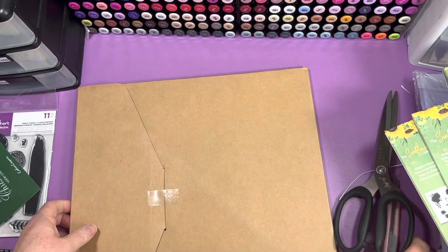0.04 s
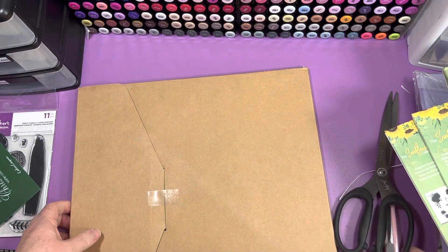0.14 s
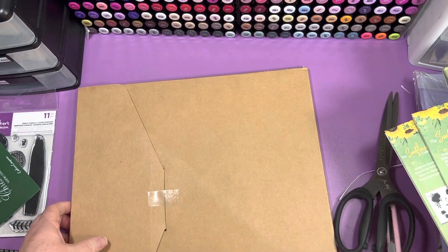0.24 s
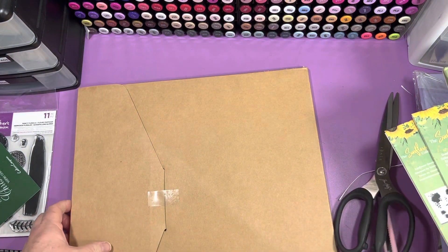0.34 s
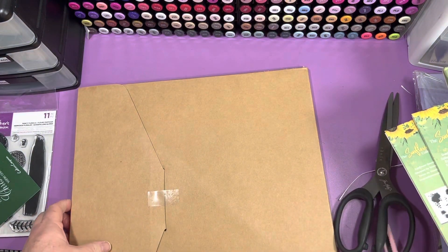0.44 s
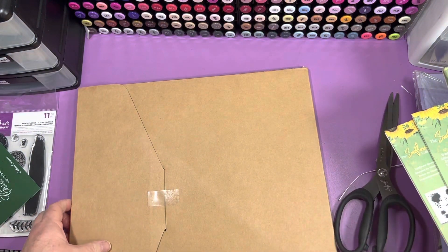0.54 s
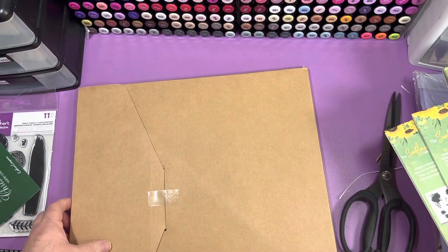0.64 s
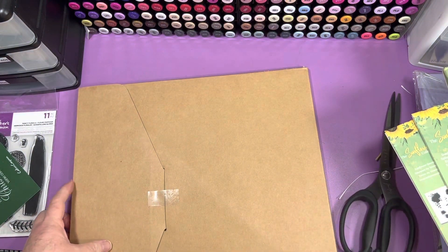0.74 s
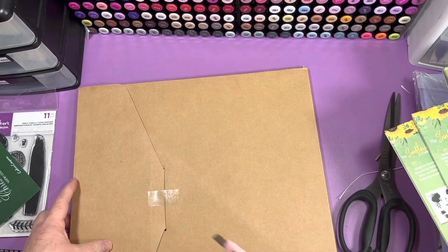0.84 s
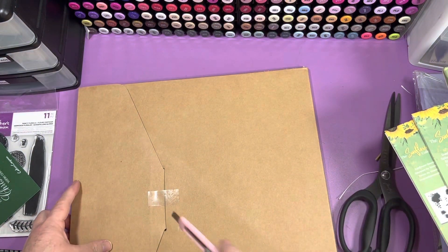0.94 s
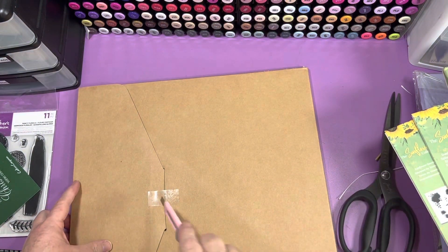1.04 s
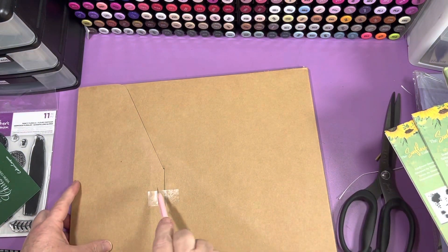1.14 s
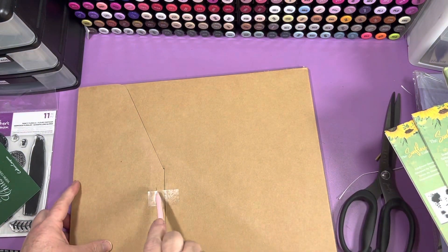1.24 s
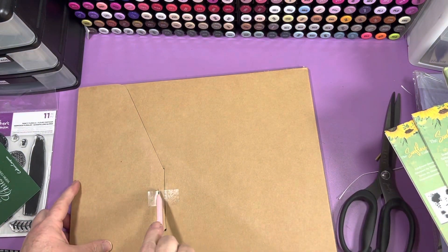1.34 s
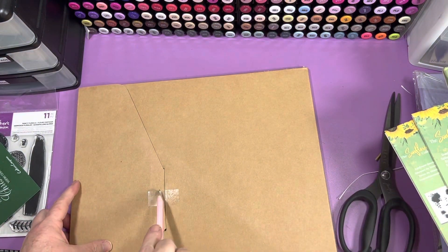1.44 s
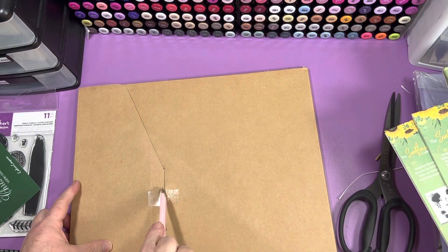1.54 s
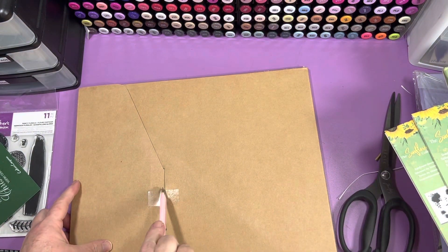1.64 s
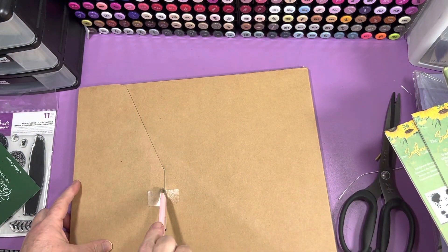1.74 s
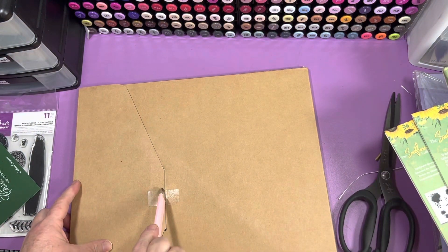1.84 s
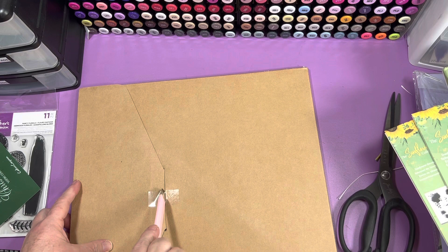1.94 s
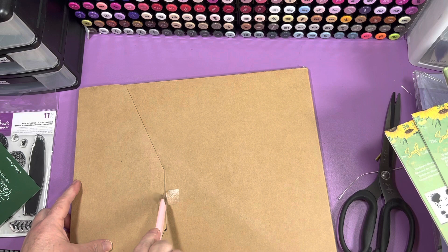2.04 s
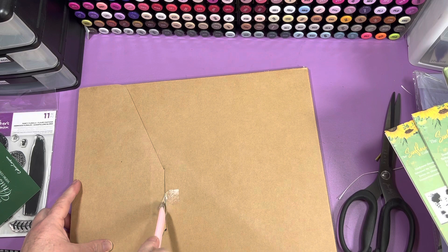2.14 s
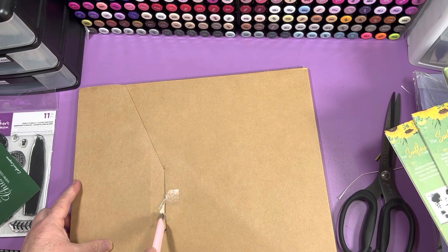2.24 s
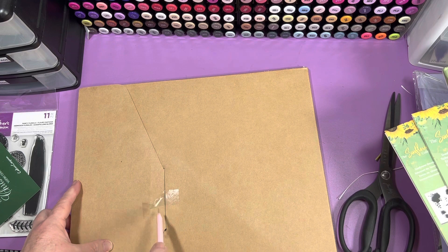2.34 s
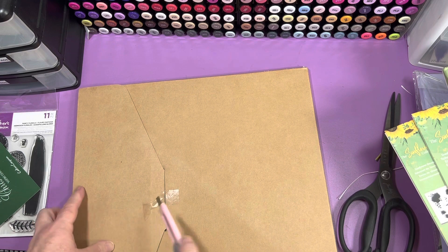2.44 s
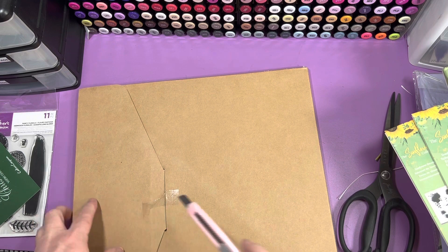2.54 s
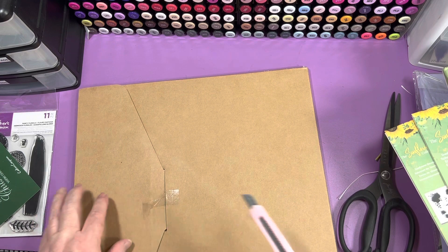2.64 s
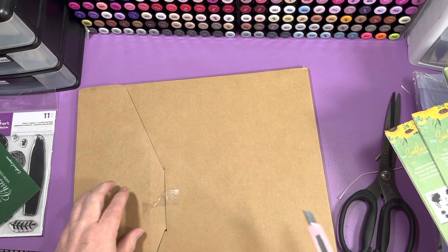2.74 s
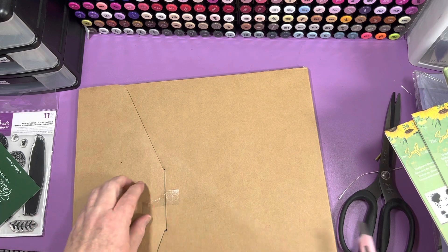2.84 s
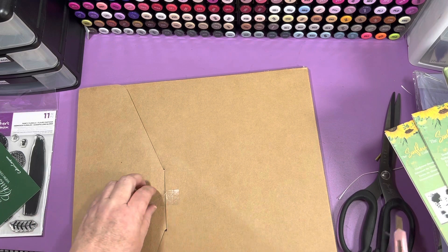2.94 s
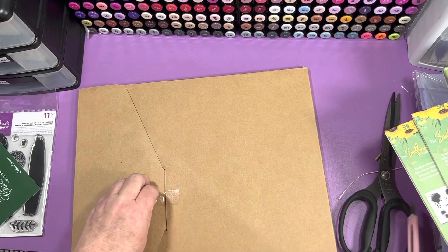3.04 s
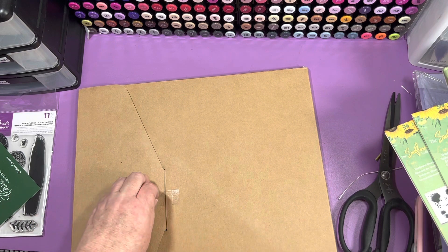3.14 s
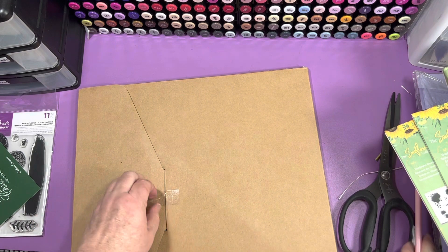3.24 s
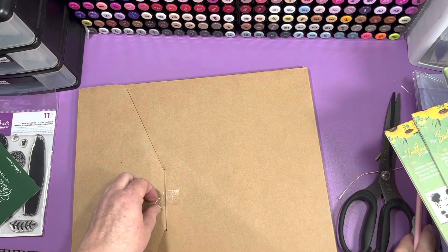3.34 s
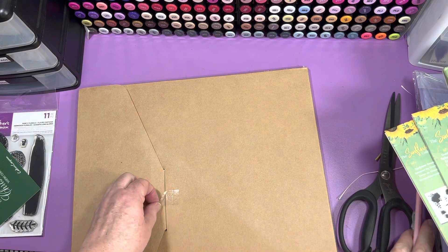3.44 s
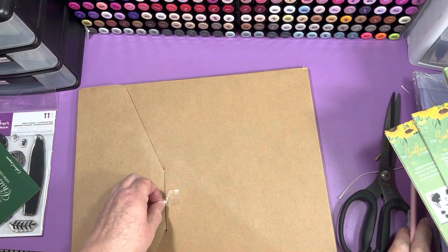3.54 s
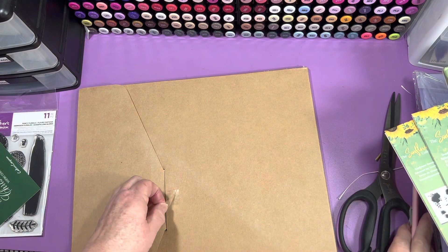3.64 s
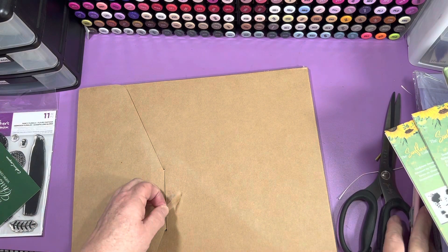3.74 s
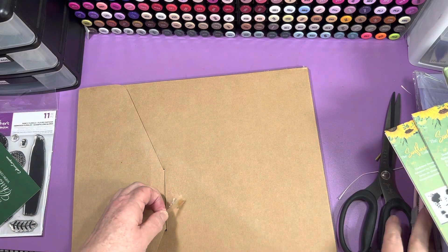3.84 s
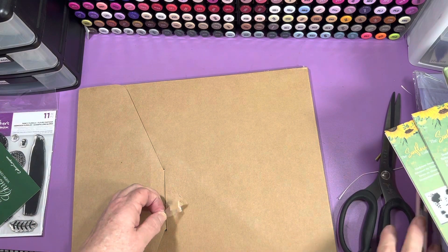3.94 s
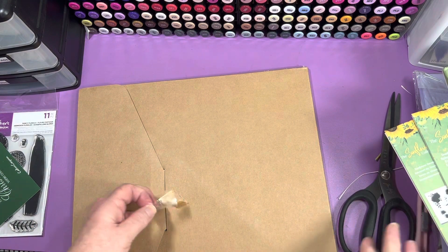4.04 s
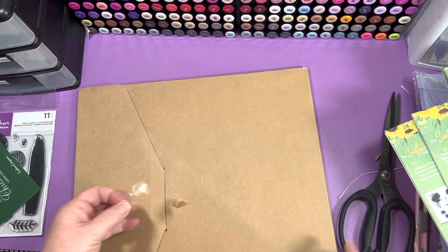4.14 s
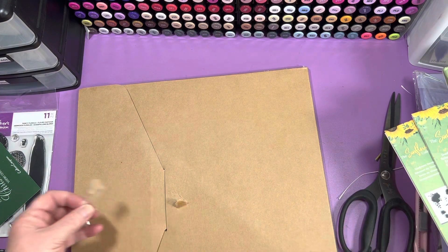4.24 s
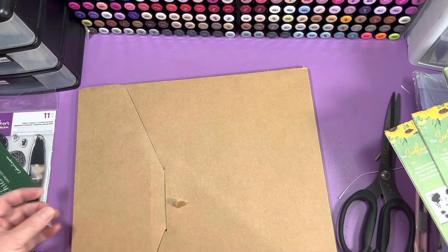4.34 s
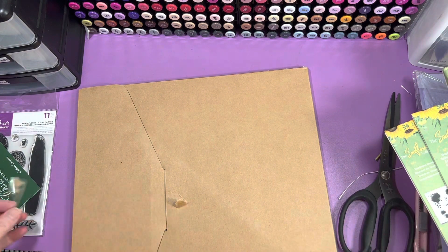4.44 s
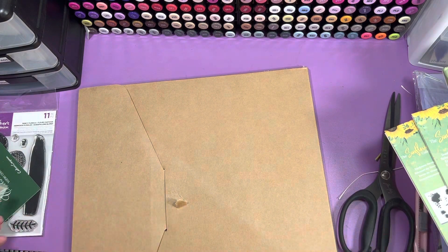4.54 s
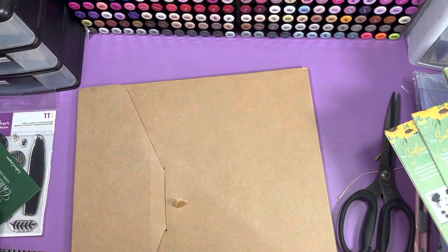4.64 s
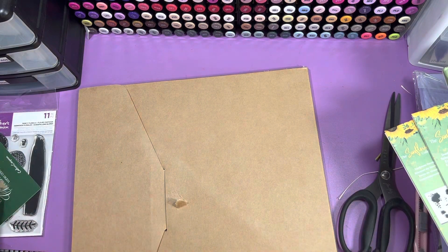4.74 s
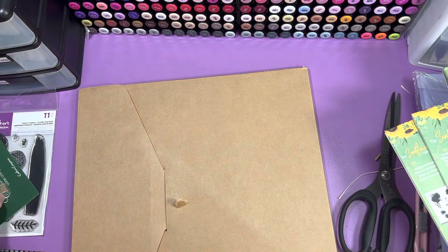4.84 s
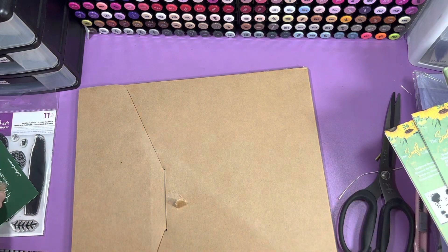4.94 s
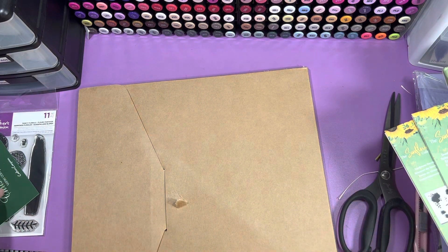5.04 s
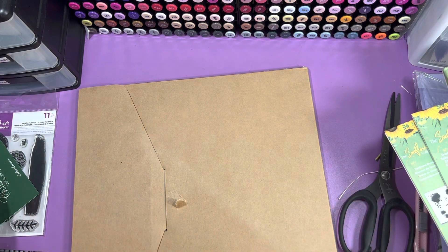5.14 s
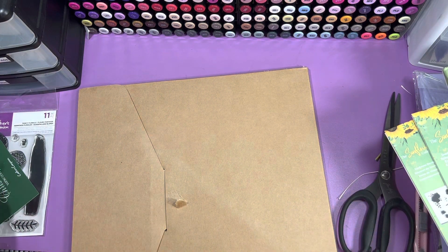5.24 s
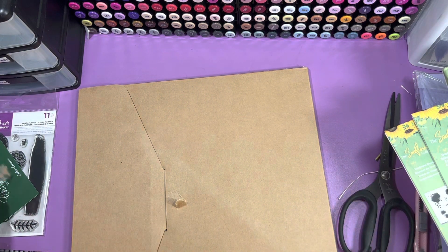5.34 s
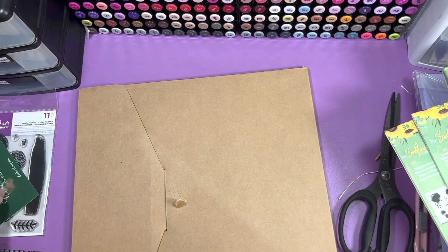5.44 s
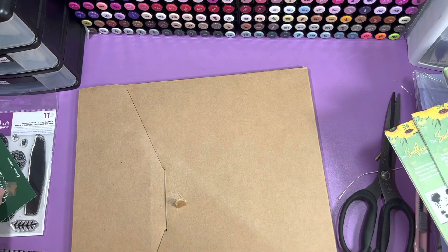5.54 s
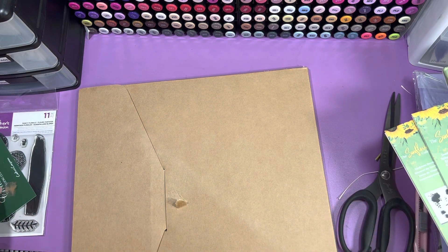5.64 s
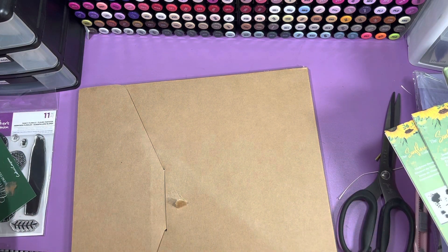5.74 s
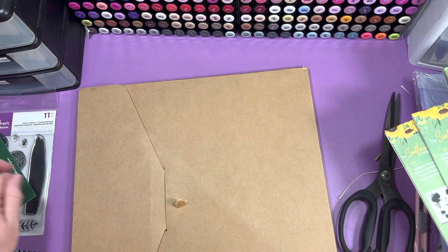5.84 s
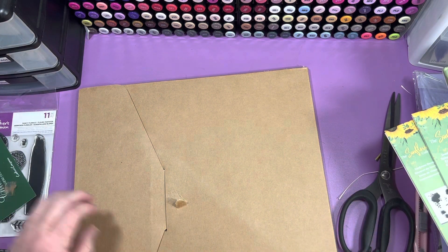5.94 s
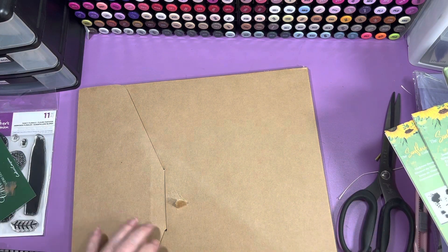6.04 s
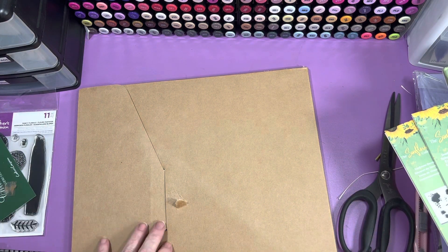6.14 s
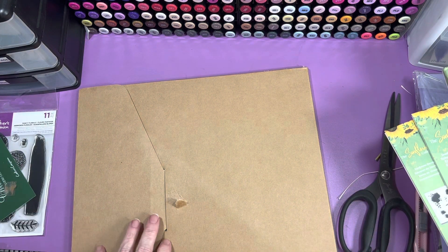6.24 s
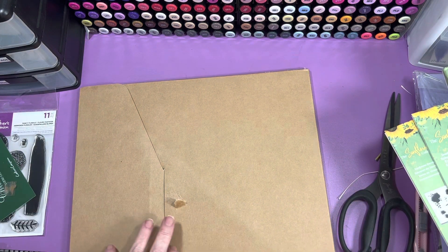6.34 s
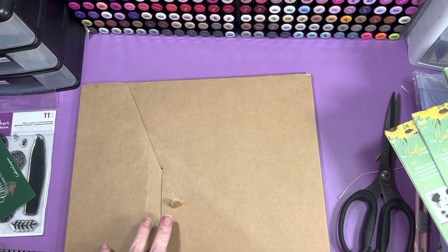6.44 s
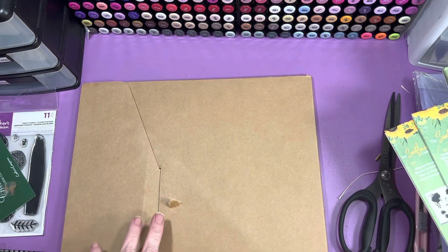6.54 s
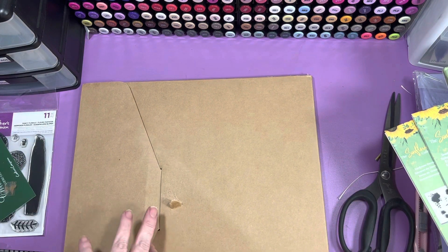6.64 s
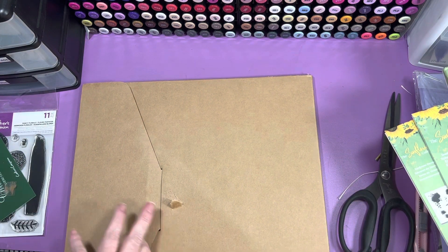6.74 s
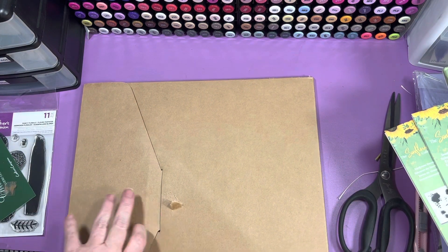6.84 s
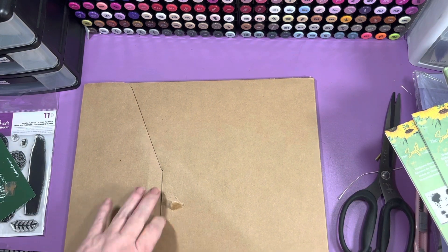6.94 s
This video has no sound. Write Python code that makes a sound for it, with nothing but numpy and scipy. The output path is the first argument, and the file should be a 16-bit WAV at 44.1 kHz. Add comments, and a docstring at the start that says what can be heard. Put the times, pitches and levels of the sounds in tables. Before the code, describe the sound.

Close, dry handling of a stiff envelope: tool knocks, faint blade snaps, one growing tape rip, sparse fingertip ticks, final paper taps.

```python
"""Opening a taped envelope

A stiff paper envelope on a craft desk in a quiet room, close to a small stereo microphone. A knife is picked
up beside the scissors and slits the tape seal; fingers peel the tape in one rip, pick the sticky scrap off
the skin, then tap and lift the flap. Bursts of noise make the contacts and random clicks the rubbing; they
ring the modes of the paper panel or tools. Low damped sines are the bumps; rumble and hum lie behind."""
import sys
import numpy as np
from scipy import signal
from scipy.fft import rfft, irfft
from scipy.io import wavfile

SR = 44100
rng = np.random.default_rng(int(sys.argv[2]) if len(sys.argv) > 2 else 0)


def generate_wav(signal):
    """Clip the signal to [-1, 1] and save it as 16-bit WAV at the path in sys.argv[1]."""
    frames = np.transpose(np.atleast_2d(signal))
    scaled = np.clip(frames, -1, 1) * 32767
    pcm = np.round(scaled).astype(np.int16)
    wavfile.write(sys.argv[1], SR, pcm)


N = 308259
TIME = np.arange(N) / SR
FREQS = np.fft.rfftfreq(N, 1 / SR)

# Patches of glue letting go. Each row: time in seconds, relative level in dB, sharpness in dB
# (in all contact tables 0 is usual for the kind, below 0 is soft and dull).
GLUE_SNAPS = [(3.3874, -58.5, 8.5), (3.5089, -54.5, 5), (3.5182, -47, 10), (3.5273, -43, 8),
              (3.5676, -42.5, 6.5), (3.6116, -42, 2), (3.7317, -42, 1.5), (3.828, -37.5, 0),
              (3.8539, -41, -4), (3.8812, -36.5, 3), (3.9099, -43, -2.5), (3.937, -39, 1),
              (3.9498, -38.5, 3.5), (3.9803, -34, -4), (3.9883, -38.5, -7), (3.9949, -40, 1)]
# Force spectrum of tearing glue. Each row: frequency in Hz, relative level in dB.
PEEL_COLOUR = [(200, 0.5), (650, 4.5), (1000, -4.5), (1500, 4), (2300, 3.5), (3400, 1.5), (4600, -1.5),
               (5150, 3.5), (5700, -5), (8300, 4), (12500, 2.5), (16000, -4.5)]
# Modes of the envelope's panel, also rung by knife, scrap and hands.
# Each row: frequency in Hz, width in Hz (at least 60 is used), relative level in dB.
PANEL_MODES = [(213, 86, -10.5), (352, 27, -9.5), (488, 90, -4.5), (680, 220, -4), (1113, 350, -4.5),
               (1280, 145, 3), (1428, 200, 0.5), (1694, 160, -3.5), (1866, 140, -5), (2364, 600, -23)]


def tape():
    """Glue strands tear out of the paper in a dense crackle, with jerks where a whole patch lets go."""
    peel_start_s, yank_start_s, peel_end_s = 3.52, 3.925, 3.988
    peel_s = peel_end_s - peel_start_s
    yank_s = peel_end_s - yank_start_s
    rasp, body, fizz = friction(PEEL_COLOUR, PANEL_MODES, rate=1500, scatter_db=2.2, spread=1.7,
                                slip_rate=260, slip_db=2.5)
    # one steadily growing pull, then a yank that frees the end
    pull = rub(peel_start_s, peel_s, db=-42.5, growth_db=6, attack_s=0.013, release_s=0.0094)
    yank = rub(yank_start_s, yank_s, db=-37.5, growth_db=1, attack_s=0.012, release_s=0.007)
    # the longer the freed tape, the more it shakes the envelope
    freed = np.clip((TIME - peel_start_s) / peel_s, 0, 1)
    panel_db = -1 + 1.5 * freed
    crackle = np.hypot(pull, yank) * (rasp + amp(panel_db) * body + amp(1.5) * fizz)
    jerks = contacts(GLUE_SNAPS, PEEL_COLOUR, PANEL_MODES, gain_db=-11, body_db=0.5, fizz_db=-6, snap=0.7,
                     creep_s=0.0003, contact_s=0.0016, spot_hz=4930, soft_body=1.1)
    return crackle + jerks


# The blade catching and breaking through the tape.
# Each row: time in seconds, relative level in dB, sharpness in dB.
BLADE_SNAPS = [(1.5225, -63.5, 4), (1.6711, -63.5, -9), (1.7278, -67.5, -12), (1.9379, -59.5, 1),
               (1.9911, -57.5, 10), (2.0081, -56.5, -5), (2.0142, -42.5, 7), (2.0334, -45.5, 6),
               (2.0485, -53, -1), (2.0773, -45.5, 2), (2.0915, -45.5, 1), (2.1104, -46.5, 5),
               (2.1361, -55.5, 7), (2.1749, -40, 3), (2.1805, -50.5, 7.5), (2.1953, -42, 9),
               (2.2336, -45.5, -4.5), (2.3147, -50, 1), (2.3343, -50.5, 5.5), (2.5373, -53, 2)]
# The blade dragging through the seal. Each row: start in seconds, length in seconds, relative level
# in dB midway, growth over the rub in dB, pressure in dB.
SLIT_RUBS = [(1.91, .085, -63, 3, 0), (2.0, .15, -63.5, 3, -1), (2.16, 0.079, -57.5, -7.5, 0.5),
             (2.29, 0.089, -69, -7, 2)]
# The paper groaning under the blade's pressure.
# Each row: start in seconds, length in seconds, level in dB midway, growth in dB.
GROAN_RUBS = [(1.73, 0.089, -61, -4), (1.974, 0.16, -55.5, 11), (2.15, 0.04, -60, 0.5)]
# Force spectrum of the blade. Each row: frequency in Hz, relative level in dB.
BLADE_COLOUR = [(200, 7.5), (600, -2.5), (900, 4), (1500, -5.5), (2500, 7.5), (5000, 1.5), (8500, 2),
                (12000, -4), (14000, -3), (16000, -16)]
# Filter that makes the groan. Each row: frequency in Hz, relative level in dB.
GROAN_COLOUR = [(120, -15.5), (200, -14), (340, 12), (450, 2), (700, -6.5), (1000, -25.5), (2000, -54)]


def knife():
    """The blade scrapes and snaps through the seal while the paper groans under it."""
    snaps = contacts(BLADE_SNAPS, BLADE_COLOUR, PANEL_MODES, gain_db=-10, body_db=2, fizz_db=4, snap=0.51,
                     creep_s=0.00087, contact_s=0.00085, spot_hz=4430, soft_body=0.38)
    grains = friction(BLADE_COLOUR, PANEL_MODES, rate=1900, scatter_db=2, spread=0.55,
                      slip_rate=180, slip_db=5)
    scrape = drag(SLIT_RUBS, grains, rasp_db=0.5, body_db=4, fizz_db=4, dulling=0.8,
                  attack_s=0.005, release_s=0.013)
    groan_gain = sum(rub(*row, attack_s=0.005, release_s=0.012) for row in GROAN_RUBS)
    groan = unit(shade(grains[1], GROAN_COLOUR)) * groan_gain
    return snaps + scrape + groan


# The tape scrap unsticking from the fingertips.
# Each row: time in seconds, relative level in dB, sharpness in dB.
SCRAP_TICKS = [(4.2992, -52, -5.5), (4.324, -64, -7), (4.4347, -59, 8.5), (4.6024, -63.5, -1.5),
               (4.7615, -53.5, -4.5), (4.8782, -44.5, 7), (4.941, -61, -12), (5.0295, -50, 1.5),
               (5.164, -71.5, 8.5), (5.4643, -43.5, 3.5), (5.5654, -51, 7.5), (5.6855, -81.5, 12)]
# Fingertips rolling the scrap.
# Each row: start in seconds, length in seconds, relative level in dB midway, growth in dB.
ROLL_RUBS = [(4.208, 0.1, -72.5, 7), (4.39, .22, -86.5, 9), (4.757, 0.13, -71.5, -7),
             (4.926, 0.11, -69, -7), (5.371, 0.2, -71, 9.5)]
# Force spectrum of the scrap. Each row: frequency in Hz, relative level in dB.
SCRAP_COLOUR = [(200, -6.5), (900, 2.5), (1500, -6), (3000, 11.5), (5000, 9), (6700, 8), (9000, 8),
                (12000, 8), (16000, 0.5)]


def scrap():
    """The sticky scrap is rolled between the fingers and ticks as it comes off the skin."""
    rasp, body, fizz = friction(SCRAP_COLOUR, PANEL_MODES, rate=4300, scatter_db=2.5, spread=0.76,
                                slip_rate=40, slip_db=2)
    roll_gain = sum(rub(*row, attack_s=0.01, release_s=0.022) for row in ROLL_RUBS)
    rolling = (rasp + amp(-6) * body + amp(6) * fizz) * roll_gain
    ticks = contacts(SCRAP_TICKS, SCRAP_COLOUR, PANEL_MODES, gain_db=-10, body_db=-16, fizz_db=5, snap=0.38,
                     creep_s=0.00011, contact_s=0.00065, spot_hz=5270, soft_body=0.18, spot_db=0)
    return rolling + ticks


# Fingers and flap tapping the envelope.
# Each row: time in seconds, relative level in dB, sharpness in dB.
PAPER_TAPS = [(0.4515, -56, 3), (0.5896, -52, -3), (0.6069, -58, -3), (0.6517, -57, -5),
              (0.6797, -56.5, -1), (2.4346, -67, -2), (2.5744, -59.5, -11), (2.8389, -60, -3),
              (3.0696, -63, 6), (6.0841, -46, 5.5), (6.3916, -65, 4), (6.5483, -59.5, -8), (6.6198, -40, 7),
              (6.6304, -61, -1), (6.7348, -43, 0.5), (6.7719, -57.5, 6.5)]
# Skin and paper sliding over each other. Each row: start in seconds, length in seconds,
# relative level in dB midway, growth over the rub in dB, pressure in dB.
STROKES = [(0.0, 0.027, -74, -15, 6), (0.045, 0.13, -66, -8, 4.5), (0.39, 0.06, -75, 6, 7.5),
           (0.45, 0.1, -61, 10.5, 3.5), (0.58, 0.098, -73, -7, 11), (0.69, 0.054, -73, 2, 1),
           (0.87, 0.16, -81, 6.5, -4.5), (1.506, 0.025, -68, 13, 6), (2.39, 0.13, -71, 12, -1),
           (2.55, 0.11, -74, -20, 5.5), (2.833, 0.18, -62, 5, 8.5), (3.07, 0.082, -75.5, 4, 10),
           (3.222, 0.11, -68, 4.5, 9), (3.35, 0.15, -72, -10.5, 2.5), (5.88, 0.039, -75.5, 1.5, 2),
           (5.95, 0.11, -80.5, 14, 0), (6.094, .05, -59, -12, 4.5), (6.17, 0.19, -67.5, -1, 1),
           (6.387, 0.11, -61, 9, 11.5), (6.53, 0.089, -74.5, 8, 9.5), (6.65, 0.31, -74, -2.5, 8)]
# Force spectrum of the taps. Each row: frequency in Hz, relative level in dB.
TAP_COLOUR = [(200, 9.5), (550, -2.5), (1000, 1.5), (1500, -3.5), (2400, 6.5), (3300, -3), (5000, -7.5),
              (8500, -19.5), (16000, -34.5)]
# Force spectrum of sliding skin. Each row: frequency in Hz, relative level in dB.
SKIN_COLOUR = [(200, 8.5), (600, 4), (1100, 0), (1800, 2.5), (2400, 8.5), (3400, 3.5), (4400, 1),
               (5000, 2.5), (5700, -1.5), (8500, -3), (16000, -19)]


def hands():
    """Fingers brush and tap the envelope; soft fingertips land gradually."""
    grains = friction(SKIN_COLOUR, PANEL_MODES, rate=8300, scatter_db=2, spread=0.8,
                      slip_rate=230, slip_db=3.5)
    taps = contacts(PAPER_TAPS, TAP_COLOUR, PANEL_MODES, gain_db=-8.5, body_db=7.5, fizz_db=-7.5, snap=0.32,
                    creep_s=0.00073, contact_s=0.00095, spot_hz=2380, soft_body=0.1, spot_q=2, spot_db=-6.5)
    strokes = drag(STROKES, grains, rasp_db=2.5, body_db=2, fizz_db=6, dulling=0.75,
                   attack_s=0.0072, release_s=0.015)
    return strokes + taps


# Knife and scissors knocking together.
# Each row: time in seconds, relative level in dB, sharpness in dB.
TOOL_KNOCKS = [(0.1185, -40.5, -3), (0.1207, -42.5, 6.5), (0.1617, -55.5, -22.5), (0.2042, -39.5, -3),
               (0.3149, -50.5, -0.5), (0.3246, -48, -1.5), (0.3275, -47, 0), (1.1493, -79.5, -3),
               (2.7164, -74, 1)]
# The knife sliding off the scissors. Each row: start in seconds, length in seconds,
# relative level in dB midway, growth in dB, pressure in dB.
KNIFE_SLIDE = [(.309, 0.013, -49, 12.5, -2)]
# Force spectrum of the tools. Each row: frequency in Hz, relative level in dB.
TOOL_COLOUR = [(200, -3.5), (1200, -24.5), (3200, 1.5), (5200, -7), (7200, 0.5), (11500, -3), (13700, -1.5),
               (16000, -8)]
# Modes of the tools. Each row: frequency in Hz, width in Hz, relative level in dB.
TOOL_MODES = [(468, 490, -2), (1180, 170, 10), (1624, 506, 7), (2203, 1100, -1.5), (3170, 200, -34)]


def pickup():
    """The knife knocks against the scissors and slides off them."""
    knocks = contacts(TOOL_KNOCKS, TOOL_COLOUR, TOOL_MODES, gain_db=-9, body_db=-3, fizz_db=3.7, snap=0.15,
                      creep_s=0.00048, contact_s=0.00036, spot_hz=3500, soft_body=0.15, spot_db=-7.5)
    grains = friction(TOOL_COLOUR, TOOL_MODES, rate=2100, scatter_db=2.5, spread=0.66,
                      slip_rate=130, slip_db=3)
    slide = drag(KNIFE_SLIDE, grains, rasp_db=-0.5, body_db=-10.5, fizz_db=-13, dulling=0.8,
                 attack_s=0.0055, release_s=0.0068)
    return knocks + slide


# The envelope bumping on the desk. Each row: time in seconds, starting level of the lower mode's
# decay in dB, its pitch in Hz, time to fall by 60 dB in seconds.
BUMPS = [(0.602, -28, 75.6, 0.16), (.660, -31.5, 89.7, 0.14), (2.579, -42, 35.6, 0.21),
         (3.978, -28.5, 235.2, 0.1), (6.086, -27, 151, 0.035), (6.221, -33.5, 213, 0.05),
         (6.626, -45, 186, 0.15)]


def bumps(rise_s=0.00042, upper_ratio=1.7, upper_db=-8):
    """The envelope lands on its cushion of air: two low, quickly damped modes."""
    out, t = np.zeros((2, N)), TIME[:SR // 3]
    for s, db, hz, t60 in BUMPS:
        turn = 2 * np.pi * hz * t
        envelope = amp(db - 60 * t / t60) * (1 - np.exp(-t / rise_s))
        add(out, s, envelope * (np.sin(turn) + amp(upper_db) * np.sin(upper_ratio * turn)))
    return out


def contacts(table, colour, modes, gain_db, body_db, fizz_db, snap, creep_s, contact_s, spot_hz, soft_body,
             spot_q=4, spot_db=2):
    """Slips build up as a contact creeps, it lets go with a snap, and they die within the contact time.
    Sharp contacts are short, high and fizzy; soft ones shake the body more."""
    halving_db, octave_db = 23, 14  # sharpness that halves the contact time, and that raises it an octave
    lead = SR // 100  # samples before the snap
    out, t = np.zeros((2, N)), TIME[:SR // 12] - lead / SR
    for (s, db, sharp), slips in zip(table, rng.standard_normal((len(table), len(t)))):
        span = contact_s * 2 ** (-sharp / halving_db)
        pitch = np.clip(spot_hz * 2 ** (sharp / octave_db), 2200, 8800)
        # longer contacts also build up more slowly
        force = slips * np.exp(np.minimum(t / (creep_s + span / 2), -t / (2 * span)))
        force /= np.linalg.norm(force)
        force[lead] += snap
        force = tint(force, colour)
        # the spot that is touched rings briefly at a pitch of its own
        force = force + amp(spot_db) * signal.lfilter(*signal.iirpeak(pitch, spot_q, fs=SR), force)
        crack, body, fizz = radiate(force, modes)
        sound = crack + amp(body_db - soft_body * sharp) * body + amp(fizz_db + sharp) * fizz
        add(out, s - lead / SR, amp(db + gain_db) * sound)
    return out


def friction(colour, modes, rate, scatter_db, spread, slip_rate, slip_db):
    """Fibres catch and break at random, their strength changing as the contact sticks and slips.
    Each throws its treble unevenly to the two sides; the rates are per second."""
    breaks = rng.random(N) < rate / SR
    strength = amp(scatter_db * np.minimum(rng.exponential(size=N), 4))
    force = breaks * rng.choice([-1, 1], N) * strength
    # every slip lasts a random time and has its own strength
    slip = np.cumsum(rng.random(N) < slip_rate / SR)
    slip_gain = amp(slip_db * rng.uniform(-1, 1, N + 1)[slip])
    force = hand_echo(force * slip_gain)
    crack, body, fizz = radiate(tint(force, colour), modes)
    sides = np.array([hand_echo(force * share) for share in rng.standard_normal((2, N))])
    aside = radiate(tint(sides, colour), modes)[0]
    return unit(crack + spread * aside), body, fizz


def drag(table, grains, rasp_db, body_db, fizz_db, dulling, attack_s, release_s):
    """Play friction grains along each rub; pressure brings out the body and smothers the fizz."""
    rasp, body, fizz = grains
    gains = np.array([rub(*row[:4], attack_s, release_s) for row in table])
    pressure = np.array(table)[:, 4]
    rasp_gain = amp(rasp_db) * gains.sum(axis=0)
    body_gain = amp(body_db + pressure) @ gains
    fizz_gain = amp(fizz_db - dulling * pressure) @ gains
    return rasp * rasp_gain + body * body_gain + fizz * fizz_gain


def rub(start, length, db, growth_db, attack_s, release_s):
    """Gain of one rub: it sets in quickly, grows or fades evenly while the hand moves, and dies away."""
    t = TIME - start
    outside = np.maximum(-t / attack_s, (t - length) / release_s).clip(0, 40)
    progress = np.clip(t / length, 0, 1)
    return amp(db + growth_db * (progress - 0.5)) * np.exp(-outside)


def hand_echo(x, echo=0.61, longest_s=0.0012, moves_per_s=16):
    """The moving hand throws the sound back over a changing path, so the colour keeps shifting."""
    pose = np.cumsum(rng.random(N) < moves_per_s / SR)
    delay = longest_s * rng.uniform(0.2, 1, N + 1)[pose]
    source = np.maximum(np.arange(N) - (delay * SR).astype(int), 0)
    return x + echo * x[source]


def radiate(force, modes):
    """A force is heard three ways: the crack of the contact, the ringing body, the fizz of the top treble."""
    t, ring = TIME[:SR // 10], 0
    for k, (hz, width, db) in enumerate(modes):
        width = max(width, 60)
        # neighbouring modes move the surface in opposite directions
        sign = (-1) ** k
        ring = ring + sign * amp(db) * width * np.exp(-np.pi * width * t) * np.cos(2 * np.pi * hz * t)
    crack = signal.sosfilt(signal.butter(2, [2200, 9800], "band", fs=SR, output="sos"), force)
    fizz = signal.sosfilt(signal.butter(4, 11000, "high", fs=SR, output="sos"), force)
    body = signal.sosfilt(signal.butter(2, 2800, fs=SR, output="sos"), convolve(force, ring))
    return unit(crack), unit(body), unit(fizz)


def amp(db):
    """Decibels to gain."""
    return 10 ** (np.asarray(db) / 20)


def unit(x):
    """Scale to rms 1."""
    return x / np.sqrt(np.mean(x ** 2))


def along(points, hz):
    """Read (Hz, value) points on a log-frequency axis."""
    f, value = np.transpose(points)
    return np.interp(np.log(hz + 1e-3), np.log(f), value)


def shade(x, points):
    """Filter a full-length signal by a spectrum, without phase shift."""
    return irfft(rfft(x) * amp(along(points, FREQS)), N)


def convolve(x, response):
    """Filter along time, keeping the length."""
    return signal.fftconvolve(np.atleast_2d(x), np.atleast_2d(response), axes=-1)[:, :x.shape[-1]]


def tint(x, points, size=512):
    """Causal (minimum-phase) filter with the given spectrum, so attacks stay sharp."""
    cepstrum = irfft(np.log(amp(along(points, np.fft.rfftfreq(size, 1 / SR)))))
    cepstrum[1:size // 2] *= 2
    cepstrum[size // 2 + 1:] = 0
    return convolve(x, irfft(np.exp(rfft(cepstrum))))


def add(out, s, sound):
    """Mix a short sound in at time s."""
    start = max(int(s * SR), 0)
    out[:, start:start + sound.shape[-1]] += sound[..., :N - start]


def reflections(x, t60, delay_s, colour):
    """A dying cloud of echoes, different at each port; t60 is the time in seconds to fall by 60 dB."""
    t = TIME[:SR * 2 // 3]
    cloud = rng.standard_normal((2, len(t))) * np.exp(-np.log(1000) * t / t60) * (t > delay_s)
    return shade(convolve(x, cloud / np.linalg.norm(cloud, axis=1, keepdims=True)), colour)


# Spectrum of the room's rumble. Each row: frequency in Hz, relative level in dB per Hz.
AIR_COLOUR = [(12, -61), (20, -24), (43, -7.5), (65, -7), (86, -8), (123, -7.5), (204, -20.5), (228, -29.5),
              (337, -25.5), (574, -46.5), (780, -40), (1330, -52.5), (1480, -47), (2530, -56.5),
              (16000, -60)]
# Hum of a machine. Each row: frequency in Hz, level in dB rms.
HUM = [(57, -58.5), (98, -64.5), (120, -65.5), (200, -71)]


def room_tone(rumble_db=-53.5, side_db=-16, waver=0.4):
    """Low rumble, nearly the same on both sides, with a hum whose phases wander."""
    mid, side = (shade(rng.standard_normal(N), AIR_COLOUR) for _ in range(2))
    rumble = unit(mid) + amp(side_db) * unit(side) * np.array([[1], [-1]])
    knots = np.linspace(0, TIME[-1], num=50)
    hum = 0
    for hz, db in HUM:
        wander = np.cumsum(waver * rng.standard_normal(len(knots)))  # radians
        phase = 2 * np.pi * hz * TIME + np.interp(TIME, knots, wander)
        hum = hum + amp(db) * np.sqrt(2) * np.sin(phase)
    return amp(rumble_db) * rumble + hum


def scene():
    """The handling, its quick echoes off desk and shelves, and the small room around them."""
    direct = pickup() + knife() + tape() + scrap() + hands() + bumps()
    # echo colours: (Hz, dB)
    desk = reflections(direct, t60=0.061, delay_s=0.0017, colour=[
        (150, -36), (700, -2), (1500, -5), (3500, -4.5), (8000, -4), (14000, -10.5)])
    walls = reflections(direct, t60=0.2, delay_s=0.018, colour=[
        (150, -20.5), (700, -11), (1400, -17), (2600, -18), (4500, -15.5), (8000, -20), (14000, -20.5)])
    return direct + desk + walls + room_tone()


# Balance of the microphone pair. Each row: frequency in Hz, left minus right in dB.
PORT_BALANCE = [(60, -2), (300, -1.9), (700, 1.4), (1500, 1.6), (2500, 1), (4400, 5.5), (8000, 1.8),
                (14000, -1)]
# Phase between the pair. Each row: frequency in Hz, radians by which left leads.
PORT_PHASE = [(100, 0.025), (700, 1.2), (1500, 0.2), (4000, 1.3), (7000, 1.1), (9000, 2.8), (13000, 5.45),
              (16000, 22)]
# Notch of the microphone ports. Each row: frequency in Hz, gain in dB.
PORT_NOTCH = [(8700, -1), (9150, -5.5), (9500, -22), (10750, -24.5), (11150, -4.5), (11700, 0)]


def record(dry):
    """Two ports with their own colour and phase, a deep notch near 10 kHz, and a steep top cut."""
    half = np.array([[1], [-1]]) / 2  # left and right share each difference
    gain = amp(along(PORT_NOTCH, FREQS) + half * along(PORT_BALANCE, FREQS))
    ports = gain * np.exp(1j * half * along(PORT_PHASE, FREQS))
    top_cut = signal.ellip(8, 0.2, 70, 16100, fs=SR, output="sos")  # ripple dB, stopband dB, edge Hz
    return signal.sosfilt(top_cut, irfft(rfft(dry) * ports, N))


dry = scene()
out = record(dry)
generate_wav(out)
```